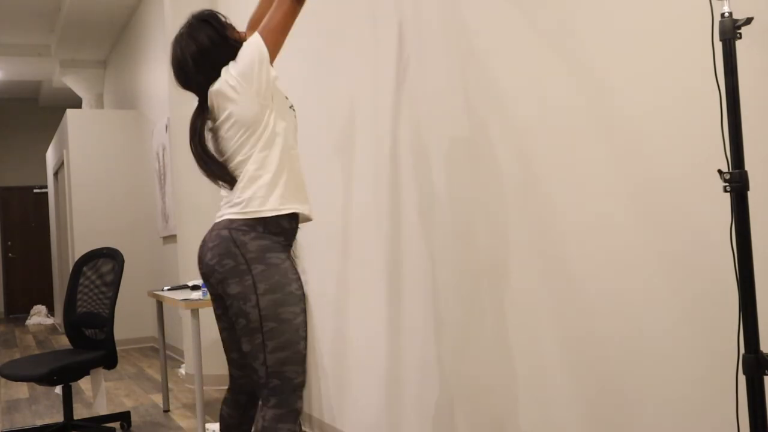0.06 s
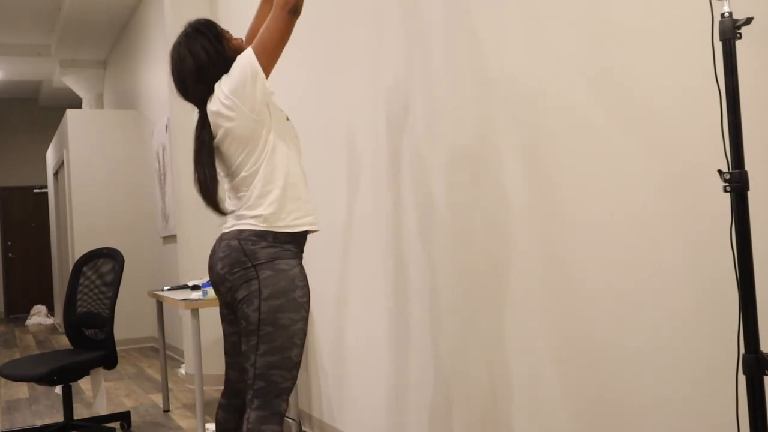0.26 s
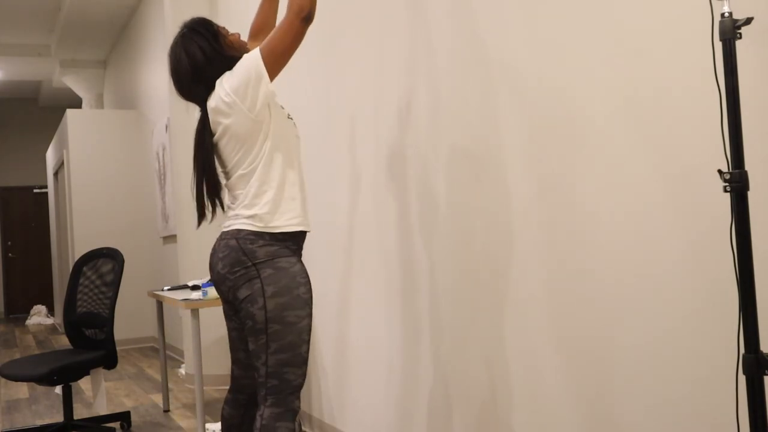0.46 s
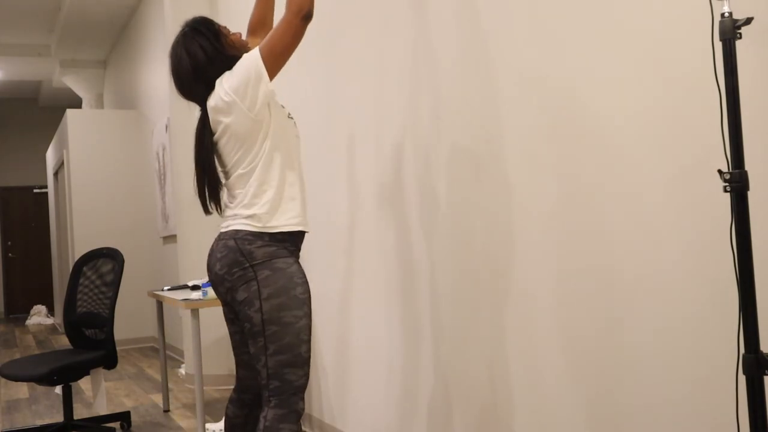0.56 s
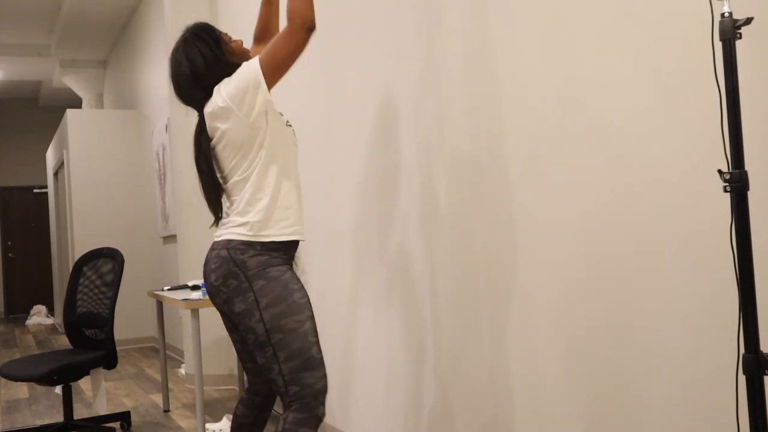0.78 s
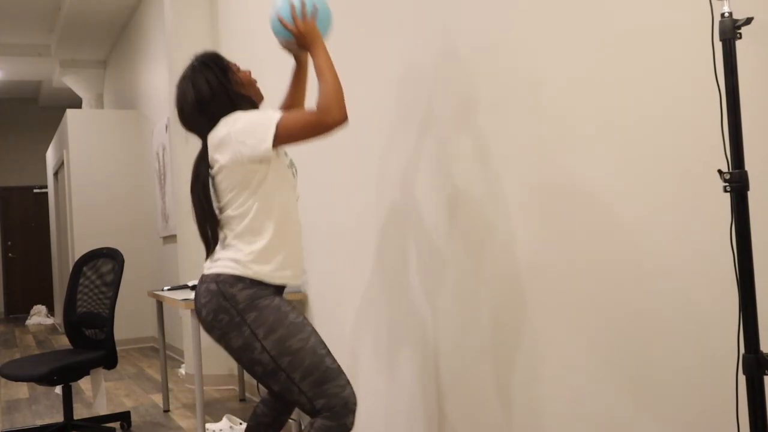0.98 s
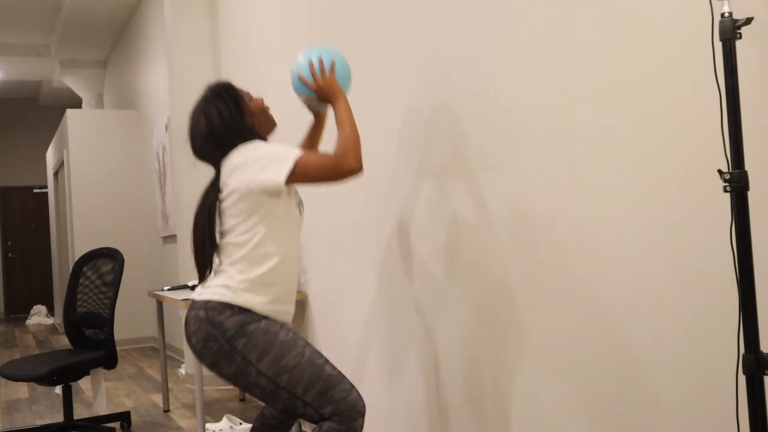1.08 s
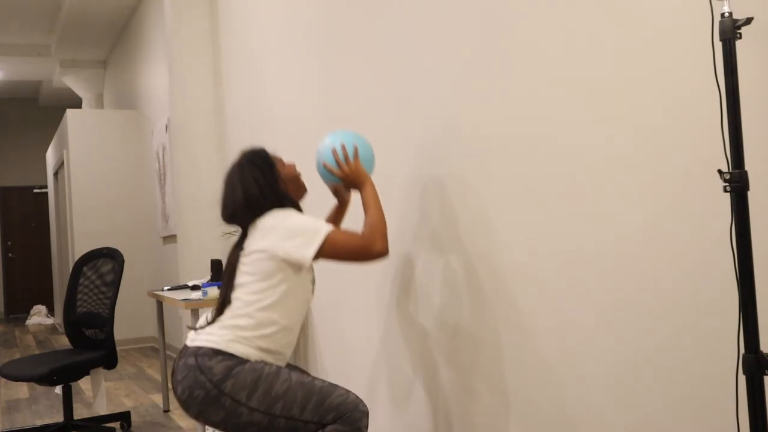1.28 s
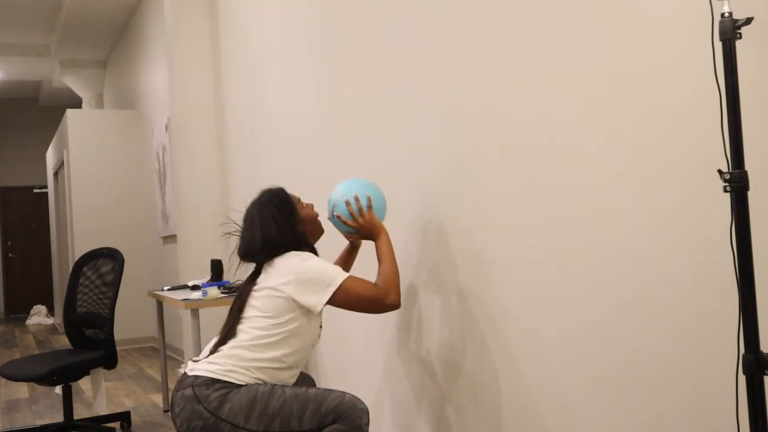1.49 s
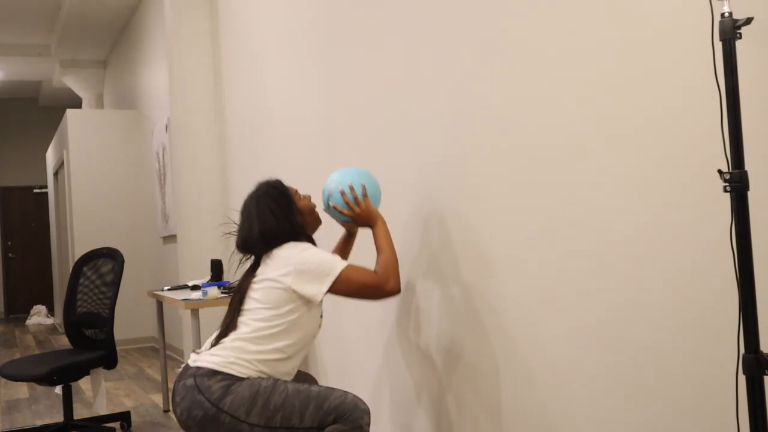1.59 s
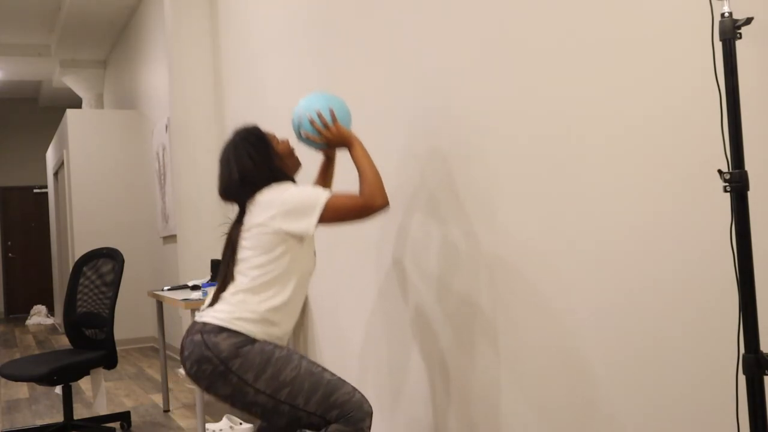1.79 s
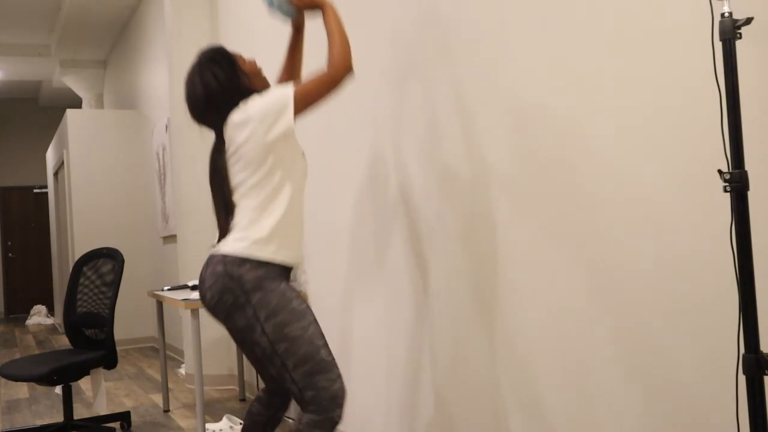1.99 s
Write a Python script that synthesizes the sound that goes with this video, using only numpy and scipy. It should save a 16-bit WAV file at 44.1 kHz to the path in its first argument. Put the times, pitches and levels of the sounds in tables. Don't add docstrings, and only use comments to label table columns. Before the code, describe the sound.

Sharp, booming smack of a light ball on a wall, followed by a softer hand catch

```python
import sys
import numpy as np
from scipy import signal
from scipy.fft import rfft, irfft
from scipy.io import wavfile

SR = 44100
rng = np.random.default_rng(int(sys.argv[2]) if len(sys.argv) > 2 else 0)


def gain_from_decibels(decibels):
    exponent = np.asarray(decibels, float) / 20
    return 10 ** exponent


def store_wav(level_fs):
    pcm = np.round(np.clip(np.atleast_2d(level_fs), -1, 1) * 32767)
    wavfile.write(sys.argv[1], SR, pcm.T.astype(np.int16))


N = 90404

THROW_S, HIT_S, CATCH_S, NEXT_THROW_S = -0.002, 0.2014, 0.826, 2.0

# (time [s], level [dB])
WALL_TOUCHES = [
    (.2017, -21.5),
    (.2023, -20.5),
    (.2033, -25.5),
    (.2040, -18),
    (.2067, -35),
    (.2105, -28),
    (.2131, -23),
    (.2229, -27.5),
]
# (time [s], level [dB])
CATCH_TOUCHES = [
    (.8272, -40.5),
    (.8290, -38),
    (.8317, -28),
    (.8345, -36.5),
    (.8367, -31.5),
    (.8389, -27),
    (.8410, -30),
    (.8440, -34),
    (.8495, -56),
]
# (frequency [Hz], level [dB], t60 [s])
BALL_ON_WALL_MODES = [(224, -7, 0.029), (417, -14, 0.038), (697, -14, 0.048), (1270, -22, 0.064),
                      (1380, -21, 0.06), (2375, -15.5, 0.037), (3250, -16, 0.014), (5220, -23, 0.016),
                      (9100, -17.5, 0.009)]
# (frequency [Hz], level [dB], t60 [s])
BALL_IN_HANDS_MODES = [(208, -9, 0.1), (378.6, -5.5, 0.034), (570, -21.5, 0.032), (1020, -21.5, 0.024),
                       (1227, -5, 0.019), (1725, -16, 0.052), (2870, -18, 0.013), (4380, -10.5, 0.012),
                       (8770, -12.5, .01)]
# (time [s], frequency [Hz], level [dB], t60 [s])
HIGH_ZING = (.1996, 3330, -30, .02)
# (rise [s], t60 [s], level [dB])
SLAP_SHAPES = [
    (0.006, 0.039, -31),
    (0.0016, 0.1, -25),
    (0.01, 0.089, -25),
    (0.032, 0.23, -45),
]
# (frequency [Hz], density [dB per Hz])
WALL_SLAP_COLOUR = [(300, -8), (900, -7), (1300, -0.5), (3300, -4), (6000, -7), (9000, -7), (16000, -12)]
# (frequency [Hz], density [dB per Hz])
HAND_SLAP_COLOUR = [(300, -14), (900, -8.5), (1500, 3), (2500, -10), (4300, -5), (9000, -13.5),
                    (16000, -11.5)]
# (frequency [Hz], level [dB], t60 [s], delay after hit [s])
WALL_PANEL_MODES = [(32.8, -48.5, 1.44, 0.036), (52.2, -35, 0.46, 0.01), (70, -35, 0.13, 0.0023),
                    (91, -21, .12, .0205), (126.8, -26.5, 0.16, 0.0251), (188.7, -42, 0.26, .036),
                    (220.8, -26, .12, 0.0026), (341, -30.5, 0.11, 0.023), (460, -24.5, 0.034, 0.0026),
                    (106, -29.5, 0.13, 0.052), (357, -38, 0.097, 0.079), (264, -28.5, 0.069, .044)]
# (frequency [Hz], level [dB], t60 [s], delay after catch [s])
CATCH_ROOM_MODES = [(66, -51, 0.14, 0.0019), (181, -43.5, 0.59, .05), (212.3, -45.5, 0.61, 0.028),
                    (397, -47, 0.4, 0.032), (460.5, -44.5, 0.54, .05), (523.4, -34, 0.18, 0.0042)]
# (delay [s], level [dB])
ECHOES = [
    (0.02, -18.5),
    (.085, -15),
]
# (build-up [s], level [dB])
TAIL_SHAPES = [
    (0.011, -47.5),
    (0.0068, -31.5),
    (.015, -36),
]
# (frequency [Hz], density [dB per Hz])
THROW_TAIL_COLOUR = [(15, -44), (25, -26), (206, 4), (256, -8), (714, 7), (2840, 1), (16000, -13.5)]
# (frequency [Hz], density [dB per Hz])
WALL_TAIL_COLOUR = [(15, -37), (30, -41), (130, -4.5), (300, -9.5), (500, -12.5), (680, -18.5), (4870, -20),
                    (16000, -30.5)]
# (frequency [Hz], density [dB per Hz])
CATCH_TAIL_COLOUR = [(15, -57), (25, -32), (206, -1.5), (714, -6), (775, -10.5), (1370, -7.5), (2110, -18),
                     (4140, -14.5), (16000, -30.5)]
# (frequency [Hz], t60 [s])
ROOM_DECAY = [(30, 0.65), (110, 0.79), (280, 0.83), (740, 0.71), (1940, 0.81), (5120, 0.63), (9000, 0.47),
              (14000, 0.27)]
# (time [s], level [dB])
ARM_RUSTLE = [
    (.88, -52),
    (.98, -64.5),
    (1.12, -60.5),
    (1.25, -64.5),
    (1.42, -72),
]
# (time [s], level [dB])
SLEEVE_BRUSH = [
    (1.58, -80),
    (1.64, -64.5),
    (1.69, -67.5),
    (1.75, -85),
]
# (time [s], level [dB], centre frequency [Hz], t60 [s])
TICKS = [(.005, -37.5, 2500, 0.018), (0.133, -53, 3500, 0.049), (0.618, -54, 2150, 0.027),
         (.773, -55.5, 2180, 0.03), (.906, -55, 8100, .12), (1.043, -51.5, 7000, 0.035),
         (1.301, -59, 5050, 0.037), (1.371, -55, 4100, .03), (1.655, -54, 1560, 0.022),
         (1.774, -60, 2500, .02), (1.90, -59, 2500, 0.018), (1.948, -58, 3500, 0.048),
         (2.04, -51, 4000, 0.028)]
# (frequency [Hz], density [dB per Hz])
HUSH_COLOUR = [(15, -51), (30, -21), (60, -7.5), (200, -4.5), (450, -7.5), (930, -15), (3000, -23),
               (16500, -29)]


def ball(touches, modes, push_s, push_db):
    times, levels_db = np.transpose(touches)
    where = (times * SR).astype(int)
    uneven_db = rng.normal(0, 3, (len(times), 16))
    clicks = np.zeros(N)
    clicks[where] = gain_from_decibels(levels_db + push_db)
    push = np.convolve(clicks, np.hanning(int(push_s * SR) + 2))[:N]
    out = butter(push, 2, 170, "high")
    for k, (hz, mode_db, t60) in enumerate(modes):
        clicks = np.zeros(N)
        clicks[where] = gain_from_decibels(levels_db + mode_db + uneven_db[:, k])
        out = out + ring(clicks, hz, t60)
    return butter(out, 2, 83, "high")


def ring(clicks, hz, t60):
    radius = gain_from_decibels(-60 / (t60 * SR))
    angle = 2 * np.pi * hz / SR
    feedback = [1, -2 * radius * np.cos(angle), radius * radius]
    return signal.lfilter([0, np.sin(angle)], feedback, clicks + 1e-18)


def slaps():
    moments = [THROW_S, HIT_S, CATCH_S, NEXT_THROW_S]
    throw, hit, catch, again = [gain_from_decibels(db) * burst(start, rise, t60)
                                for start, (rise, t60, db) in zip(moments, SLAP_SHAPES)]
    return coloured(WALL_SLAP_COLOUR) * hit + coloured(HAND_SLAP_COLOUR) * (throw + catch + again)


def zing():
    start, hz, db, t60 = HIGH_ZING
    return gain_from_decibels(db) * burst(start, 0.002, t60) * np.sin(2 * np.pi * hz * since(start))


def boom(modes, contact_s):
    out = 0
    for hz, db, t60, delay in modes:
        start = contact_s + delay
        out = out - gain_from_decibels(db) * burst(start, 0.0054, t60) * np.sin(2 * np.pi * hz * since(start))
    return out


def echoes(x):
    answer = np.zeros(SR // 5)
    for delay, db in ECHOES:
        smear = rng.standard_normal(120) * np.exp(-np.arange(120) / 24)
        i = int(delay * SR)
        answer[i:i + 120] += gain_from_decibels(db) * smear / np.sqrt(np.sum(smear ** 2))
    return butter(signal.fftconvolve(x, answer)[:N], 1, 7200, "low")


def tails():
    moments = [THROW_S, HIT_S, CATCH_S]
    colours = [THROW_TAIL_COLOUR, WALL_TAIL_COLOUR, CATCH_TAIL_COLOUR]
    out = 0
    for start, (build_s, db), colour in zip(moments, TAIL_SHAPES, colours):
        build_up = 1 - np.exp(-since(start) / build_s)
        out = out + gain_from_decibels(db) * build_up * coloured(colour, start)
    return out


def clumps():
    depth_db, bunches_per_s = 1.5, 140
    knots = rng.standard_normal(600)
    return gain_from_decibels(depth_db * np.interp(np.arange(N) / SR * bunches_per_s, np.arange(len(knots)), knots))


def rustle(moves, centre_hz):
    times, levels_db = np.transpose(moves)
    grain_level = gain_from_decibels(1.7 * rng.standard_normal(N // 200 + 1)).repeat(200)[:N]
    grains = rng.standard_normal(N) * grain_level
    band = butter(grains, 1, [centre_hz / 2, centre_hz * 2], "band")
    level_db = np.interp(np.arange(N) / SR, times, levels_db, left=-120, right=-120)
    return gain_from_decibels(level_db) * band / band.std()


def ticks():
    out, white = 0, rng.standard_normal(N)
    for start, db, hz, t60 in TICKS:
        band = butter(white, 2, [hz / 1.6, hz * 1.6], "band")
        out = out + gain_from_decibels(db) * burst(start, 0.00033, t60) * band / band.std()
    return out


def hush():
    return gain_from_decibels(-57.5) * coloured(HUSH_COLOUR)


def coloured(spectrum, start=None):
    hz = np.maximum(np.arange(N // 2 + 1) * SR / N, 1)
    bins = rfft(rng.standard_normal(N)) * gain_from_decibels(at_hz(spectrum, hz))
    bins = bins / np.std(irfft(bins, N))
    if start is None:
        return irfft(bins, N)
    place = 3 * np.log2(hz / 20)
    out = 0
    for k in range(31):
        band = irfft(bins * np.clip(1 - abs(place - k), 0, 1), N)
        t60 = at_hz(ROOM_DECAY, 20 * 2 ** (k / 3))
        out = out + band * gain_from_decibels(-60 * since(start) / t60)
    return out


def burst(start, rise, t60):
    t = since(start)
    return (1 - np.exp(-(t / rise) ** 2)) * gain_from_decibels(-60 * t / t60)


def since(start):
    return np.maximum(np.arange(N) / SR - start, 0)


def at_hz(points, hz):
    table_hz, values = np.transpose(points)
    return np.interp(np.log(hz), np.log(table_hz), values)


def butter(x, order, hz, kind):
    return signal.lfilter(*signal.butter(order, hz, kind, fs=SR), x)


def scene():
    wall_ball = ball(WALL_TOUCHES, BALL_ON_WALL_MODES, push_s=0.00024, push_db=-1)
    hand_ball = ball(CATCH_TOUCHES, BALL_IN_HANDS_MODES, push_s=0.00031, push_db=5.5)
    contacts = wall_ball + hand_ball + slaps() + zing()
    lows = boom(WALL_PANEL_MODES, HIT_S) + boom(CATCH_ROOM_MODES, CATCH_S)
    room = echoes(contacts) + clumps() * tails()
    cloth = rustle(ARM_RUSTLE, centre_hz=2770) + rustle(SLEEVE_BRUSH, centre_hz=7000) + ticks()
    return (contacts + lows + room + cloth + hush())[None]


def roll_off(x):
    return signal.sosfilt(signal.butter(12, 16650, fs=SR, output="sos"), x)


def record(dry):
    top_cut = signal.cheby2(16, 70, 16800, fs=SR, output="sos")
    mix = signal.sosfilt(top_cut, dry)
    return roll_off(mix)


dry = scene()
out = record(dry)
store_wav(out)
```